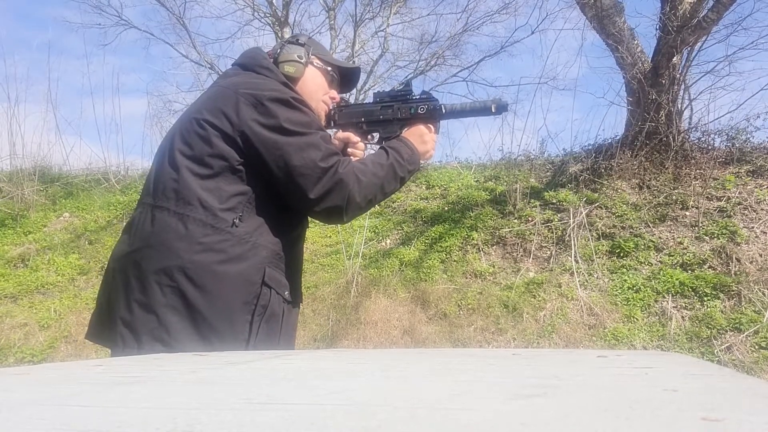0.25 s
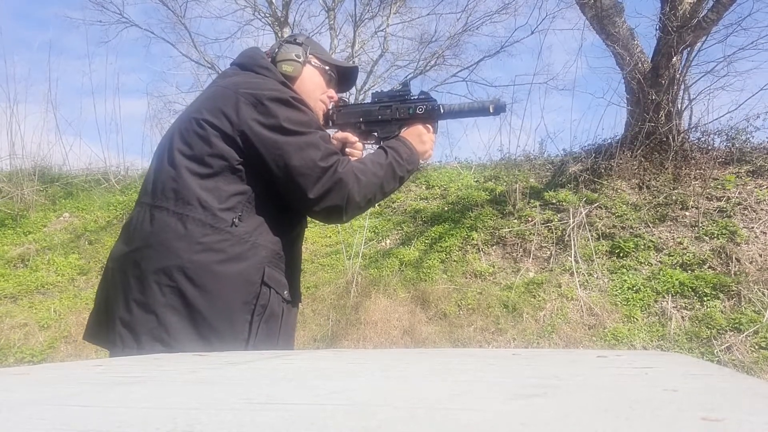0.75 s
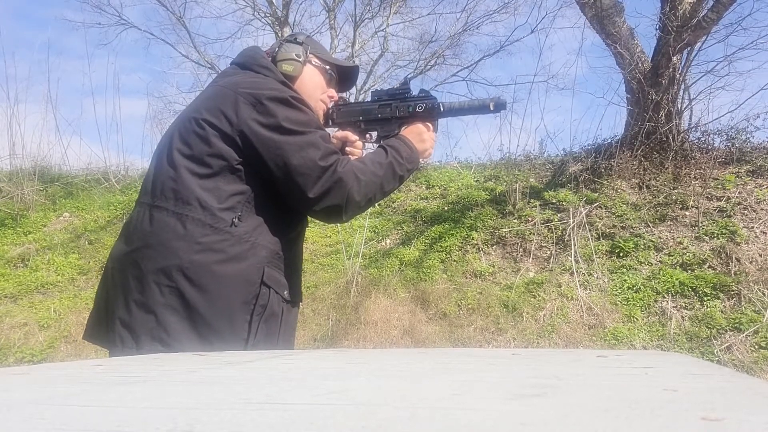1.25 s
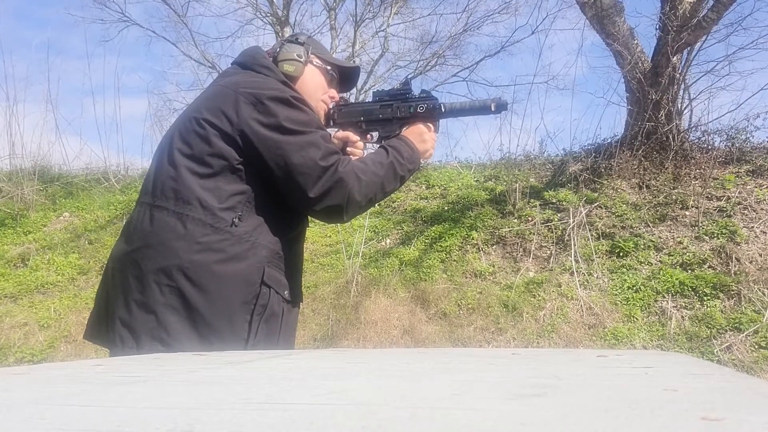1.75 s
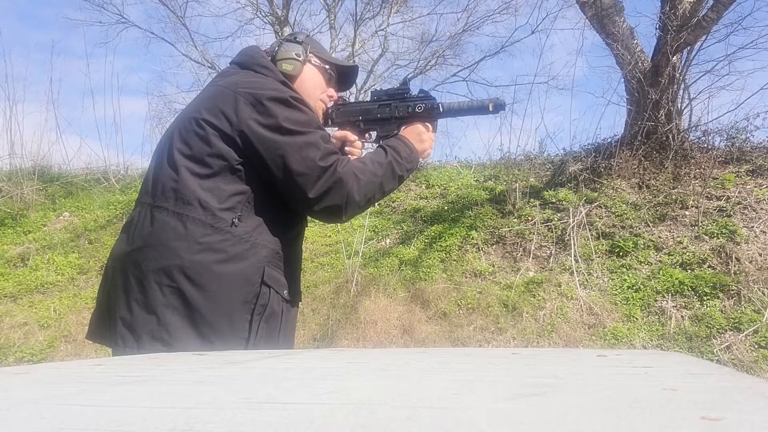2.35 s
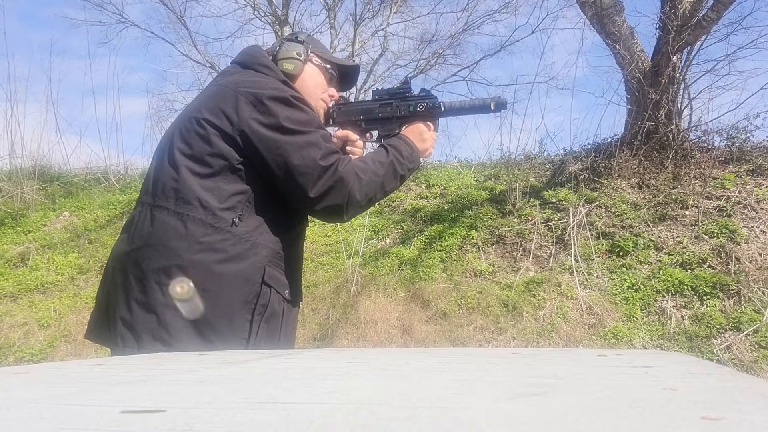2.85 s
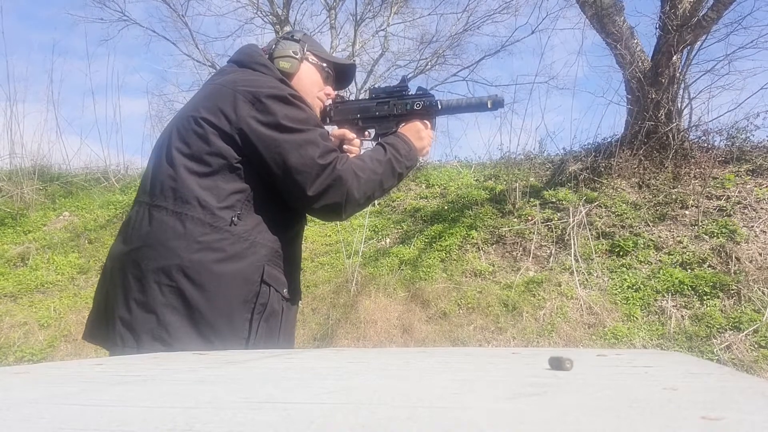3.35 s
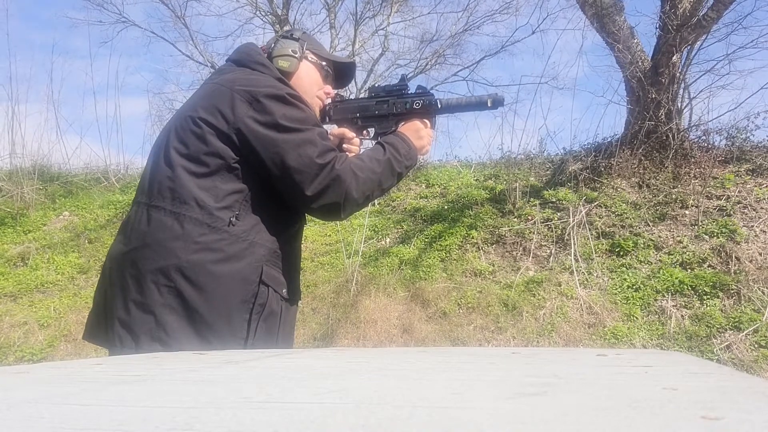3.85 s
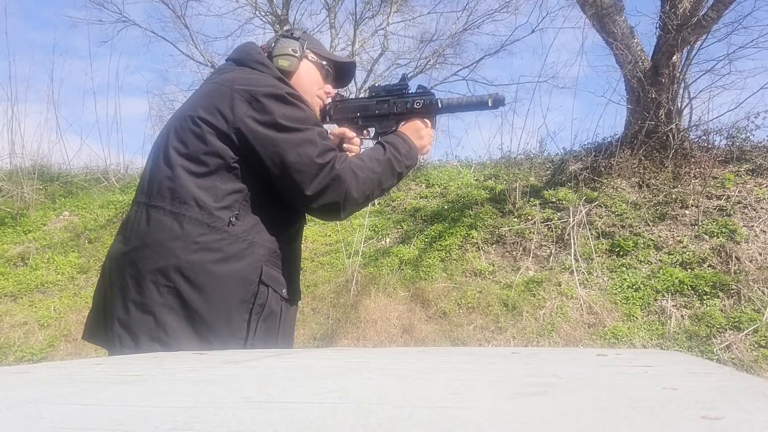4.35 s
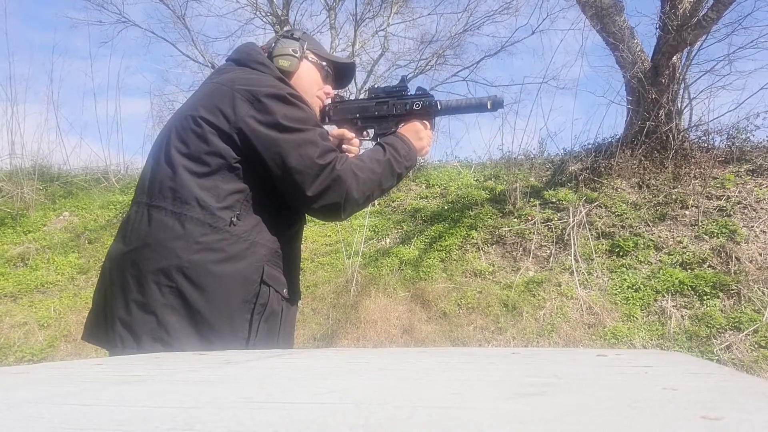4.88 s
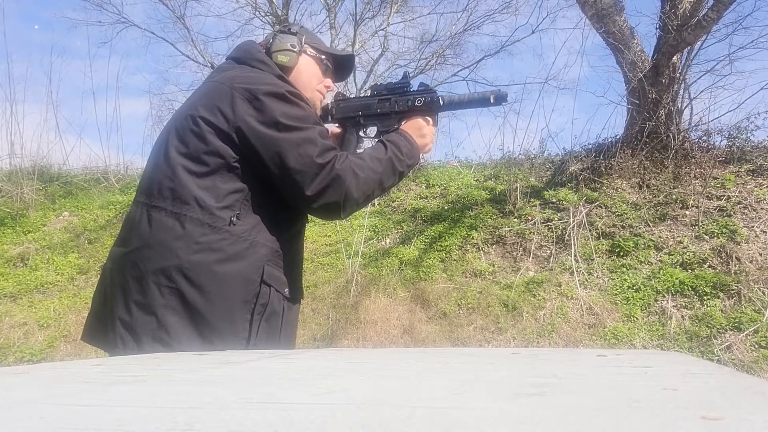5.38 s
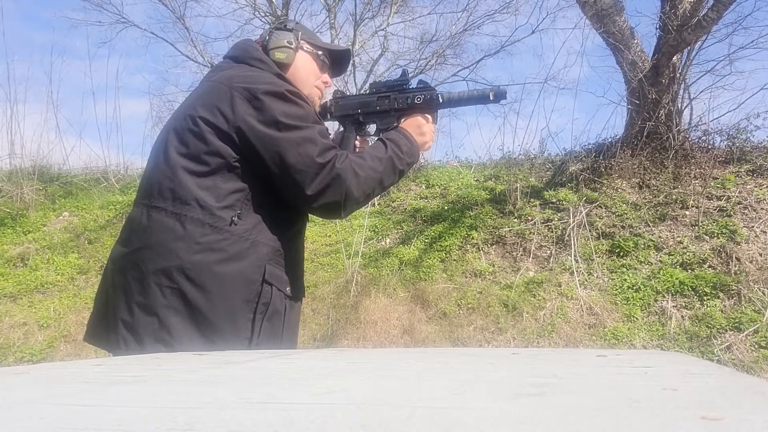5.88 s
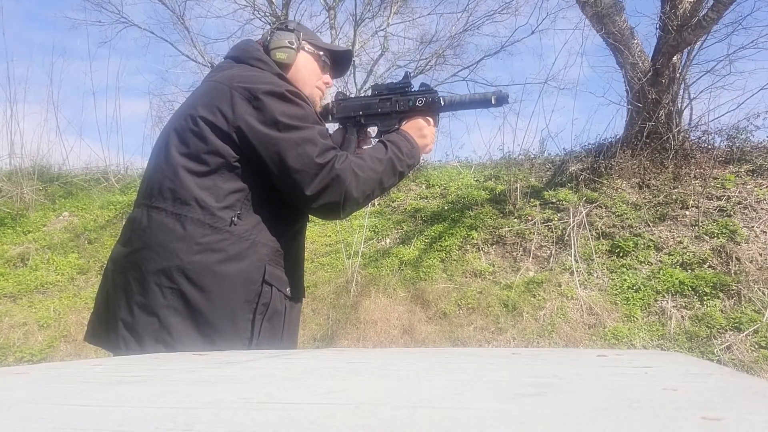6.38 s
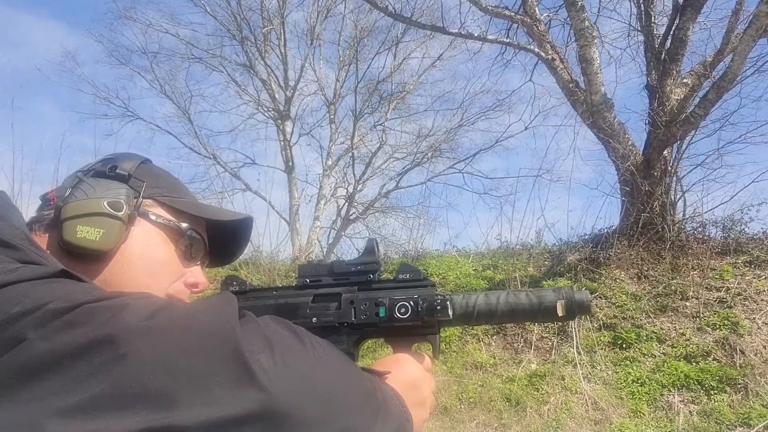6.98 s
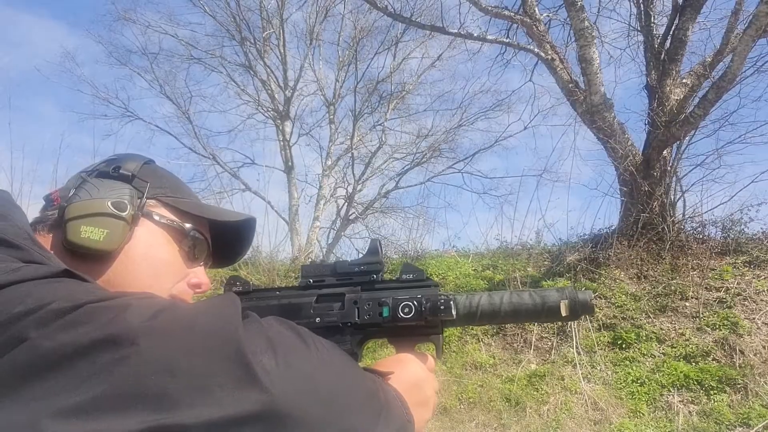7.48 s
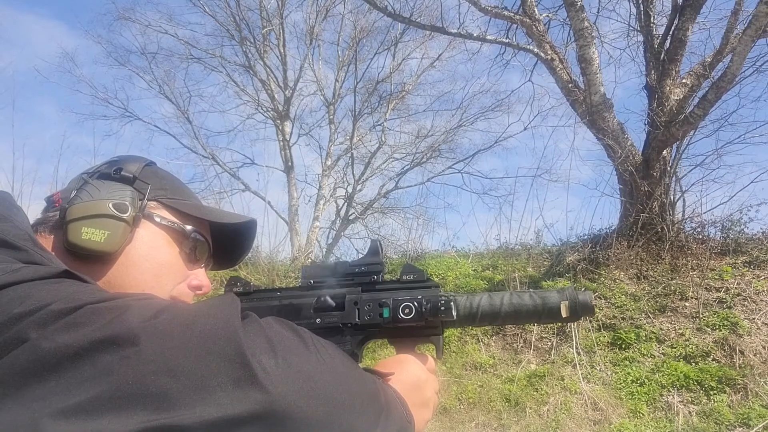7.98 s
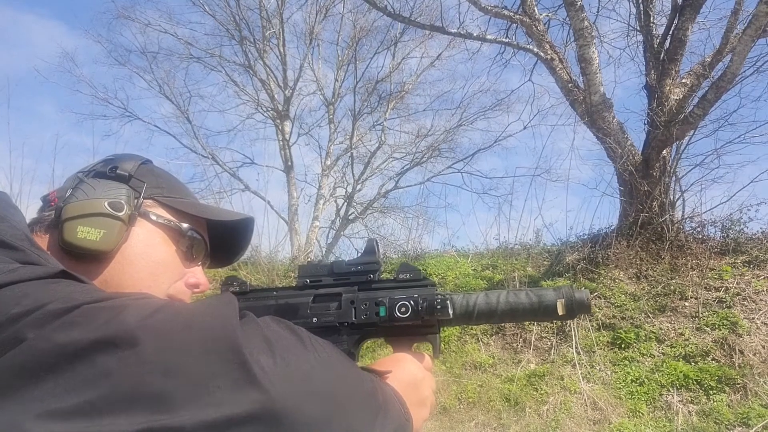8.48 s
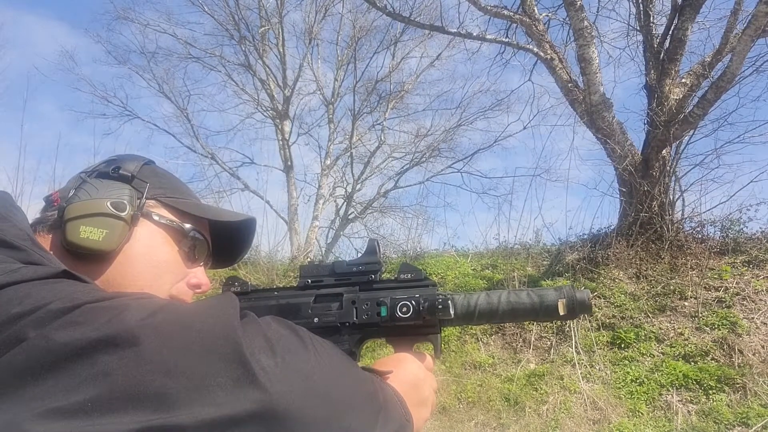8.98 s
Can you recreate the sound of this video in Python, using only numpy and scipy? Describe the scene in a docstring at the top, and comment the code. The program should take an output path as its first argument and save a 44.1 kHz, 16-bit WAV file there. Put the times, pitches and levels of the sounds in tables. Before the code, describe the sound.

Outdoors on an open range, a suppressed carbine fires four steady shots, each a short muffled whump with gas hiss, metallic bolt clack and soft thud in earth. Duller guns report far off with rolling echoes, and a spent case bounces and rolls on a plastic table beside the microphone. Then an abrupt move closer: three more shots, heavier and clackier. Low gusts rumble on the microphone throughout.

```python
"""Outdoor range: first gusts on the microphone ports, then four aimed shots of a suppressed carbine.
Each is a muffled blast, ringing action, gas hiss, bolt at its rear stop, bolt slam and thud in the berm.
Between shots other guns report far off; a spent case bounces, then rolls over the table under the microphone.
The microphone moves at 6.6 s, and the last three shots are heard from close behind the shooter.
Blows are shaped noise and damped modes; echoes are convolutions with clumpy noise."""
import sys
import numpy as np
from scipy import signal
from scipy.fft import rfft, irfft, next_fast_len
from scipy.io import wavfile
from scipy.ndimage import uniform_filter1d

SR = 44100
rng = np.random.default_rng(int(sys.argv[2]) if len(sys.argv) > 2 else 0)


def wrap_up_sound(samples):
    """Save the sound to the file named by the first command line argument, as 16-bit audio."""
    columns = np.atleast_2d(samples).T
    # keep every value between -1 and 1, then stretch to whole-number steps
    tamed = np.clip(columns, -1, 1)
    steps = np.round(tamed * 32767).astype(np.int16)
    wavfile.write(sys.argv[1], SR, steps)


N = 407043
TIME = np.arange(N) / SR
SHORT = TIME[:SR // 3]  # time axis of a single blow

# Levels of blows are base energies; each source function sets its layers relative to them.
# faint rush of the open fields: f/Hz, level/dB
AIR_TONE = [(88, -32), (150, -6.5), (702, -16), (960, -26.5), (1480, -23.5), (2140, -33.5), (6390, -41.5),
            (8070, -61), (11700, -40.5), (16000, -57.5)]
# wind strength at the exposed right port: t/s, level/dB
GUSTS = [(0.0, -37.5), (0.34, -35), (0.42, -31), (0.64, -29.5), (0.8, -49.5), (1.52, -56.5), (1.74, -23),
         (2.2, -52), (2.3, -33), (2.56, -33.5), (3.02, -55.5), (3.3, -41), (3.52, -56.5), (4.44, -37.5),
         (4.62, -51), (5.06, -32), (5.3, -42.5), (6.12, -35.5), (6.4, -49.5), (6.66, -27), (7.24, -51.5),
         (7.38, -35), (8.12, -31), (8.32, -59), (8.5, -38.5), (9.22, -35)]
# single low thumps on the ports, from large eddies and from the case's first landing:
# t/s, energy level/dB, left minus right/dB
LOW_THUMPS = [(2.435, 4.5, -16), (2.645, 1.5, 6.5), (6.601, 9.5, -13)]
# rumble of the eddies: f/Hz, level/dB
WIND_TONE = [(20, -6), (45, -1), (72, 6), (110, -5.5), (170, -16.5), (300, -27), (700, -40.5), (1500, -65),
             (4000, -76.5), (16000, -84)]
# rustle of the small eddies: f/Hz, level/dB
FLUTTER_TONE = [(100, -5.0), (350, 3.5), (700, -3.5), (1500, -19.5), (5000, -41)]

# other guns down the range: t/s, energy level/dB, muzzle hiss relative to it/dB
FAR_SHOTS = [(1.253, -2.5, -18), (2.871, -1.5, -9), (4.422, -5.5, -1.5), (6.172, 2.5, -14),
             (6.252, -3.5, 7.5)]
# dull far report: f/Hz, level/dB
FAR_TONE = [(60, -11), (220, -3.5), (420, 1), (600, -9), (1300, -12.5), (1900, -13), (2600, -26.5),
            (3200, -18.5), (6000, -42.5), (9000, -57), (11500, -46), (16000, -58.5)]
# hiss of the far muzzles: f/Hz, level/dB
FAR_HISS_TONE = [(150, -17.5), (380, -6.5), (550, -2), (730, 5.5), (1200, 1.5), (2500, -15.5),
                 (6000, -29.5), (9000, -49), (11500, -33), (16000, -40)]
# long roll of the far reports: f/Hz, level/dB
FAR_ECHO_TONE = [(80, -3), (400, 1.5), (900, -2.5), (1600, 6.5), (3200, 2), (5500, 2), (9000, -6),
                 (16000, -8.5)]
# scatter off ground and berm: f/Hz, level/dB
SCATTER_TONE = [(60, -9.5), (300, -2.5), (1000, -0.5), (2000, -9), (5000, 2.5), (9000, 1), (12000, 3.5),
                (16000, -1)]
# echo from the woods: f/Hz, level/dB
WOODS_TONE = [(60, -11.5), (400, 4), (1000, -5), (1800, -11), (3500, 1.5), (6000, -8), (10000, -30),
              (16000, -30)]
# echo from the distant bank: f/Hz, level/dB
BANK_TONE = [(200, -10.5), (900, -4), (1400, 1.5), (3000, -8.5), (6000, -18), (12000, -30)]
# echo from the trees on the berm, mostly middle: f/Hz, level/dB
TREE_TONE = [(900, -9), (1750, 0), (2600, -2.5), (6000, -16)]

# spent case landing on the table: t/s, contact energy/dB, table boom/dB, body/dB, treble/dB
BOUNCES = [(2.642, -1, -3.5, 22, -17), (2.759, 3.5, 2, 10, 5), (2.946, 3.5, 2.5, -1.5, -11.5),
           (3.099, 2.5, -1, -4, 0)]
# contact of case and table: f/Hz, level/dB
CASE_TONE = [(100, -16), (400, 2.5), (800, 0), (1600, 3), (3200, -3), (6000, -17.5), (9000, -55.5),
             (12000, -28), (16000, -17)]
# ring of the case: f/Hz, level/dB, t60/s
CASE_MODES = [(1478, -9, 0.048), (1830, -0.5, 0.036), (2700, -9.5, 0.035), (3340, -13, 0.017),
              (15100, -22, .08)]
# boom of the plastic table: f/Hz, level/dB, t60/s
TABLE_MODES = [(148.8, 1.5, 0.18), (211, 0, 0.17), (423.7, -9, 0.11), (580, -15, 0.091), (706, -3, .04),
               (923.7, -17, 0.013), (1150, -12, 0.032)]
# table top under the rolling rim: f/Hz, level/dB, t60/s
ROLLING_MODES = [(583, 0.5, 0.063), (800, 2, .02), (1250, 2.0, 0.024), (3200, -6, .008)]
# strength of the roll until the case drops off the edge: t/s, relative level/dB
ROLLING_SPEED = [(3.35, -38.5), (3.45, -3.0), (3.62, -8.0), (3.72, 0.5), (3.81, 1.5), (3.9, -56)]

# bullet in the berm: f/Hz, level/dB
THUD_TONE = [(60, -15.5), (190, 0.5), (350, -4), (900, -24.5), (1700, -22.5), (4000, -40.5), (16000, -44)]
# trigger resets and small rattles of the gun: t/s, energy level/dB, treble/dB
CLICKS = [(0.695, -1.5, -3), (2.081, -14, 1), (3.324, -18, 7), (4.237, -32.5, -0.5), (4.598, -19.5, 21),
          (5.993, -34.5, -16), (6.8047, 11.5, -7), (7.002, -20.5, -5), (7.176, -28, -4), (8.181, -10, -0.5),
          (8.446, -31, -6.5)]
# bolt slamming shut after each shot: t/s, energy level/dB, body/dB
SLAMS = [(0.7106, 14, -0.5), (2.0419, 2.5, -4), (3.2764, 12, 1.5), (4.542, 11.5, 0), (6.849, 17, 1.5),
         (8.1186, 13.5, 10.5), (9.2258, 12, -6)]
# click of small metal parts: f/Hz, level/dB
CLICK_TONE = [(150, -20), (800, -6), (1400, 6.5), (3000, -10.5), (6000, -16), (8800, -26.5), (11500, -15.5),
              (16000, -25.5)]
# bolt at its rear stop: f/Hz, level/dB
REAR_TONE = [(100, -17.5), (450, -13), (700, -18.5), (920, -2), (1300, -4), (1950, -3.5), (2800, -19.5),
             (4400, -22.5), (5600, -20.5), (8800, -32), (11300, -8.5), (16000, -23)]
# bolt closing: f/Hz, level/dB
CLOSE_TONE = [(80, -26.5), (350, -3.5), (600, -15), (800, -16), (1000, -24.5), (1400, 1), (1800, 4),
              (2500, -17), (3200, -9.5), (5000, -27.5), (8800, -37.5), (11500, -21), (16000, -42)]
# broader slam close behind the shooter: f/Hz, level/dB
NEAR_SLAM_TONE = [(500, 1.5), (950, 10), (1600, 0.5), (3200, 4), (8000, 2.5)]
# ring of the action: f/Hz, level/dB, t60/s
ACTION_MODES = [(1000, -15, 0.014), (1410, 1.5, 0.05), (1470, 3, 0.043), (1810, -7.5, 0.073)]
# carbine shots: t/s, blast energy level/dB, body/dB, treble/dB, gas push energy level/dB
SHOTS = [(0.628, 17.5, -1, -4, -1), (1.9555, 16, 9, 5.5, 9.5), (3.1943, 16.5, -4.5, -1.5, 2.5),
         (4.4589, 16, -1.5, -1, 3.5), (6.762, 18, -10, -1, 17.5), (8.0303, 18, 4, -5, 14.5),
         (9.138, 16.5, 0, 4, 15.5)]
# muffled blast: f/Hz, level/dB
BLAST_TONE = [(60, -8.5), (200, -6), (430, 4.5), (700, -8.5), (1000, 2), (1450, 1.5), (2500, -10),
              (5000, -16.5), (6700, -11.5), (8700, -29.5), (11500, -10.5), (16000, -18.5)]
# escaping gas: f/Hz, level/dB
GAS_TONE = [(100, -7.5), (400, -6), (680, -13), (950, 1.5), (1600, 2.5), (3000, -9), (6500, -23),
            (8800, -29.5), (11300, -8), (16000, -14)]
# low push of the trapped gas: f/Hz, level/dB, t60/s
PUSH_MODES = [(92, 1.53, 0.054), (175, -4, 0.075)]

# balance of the microphone ports: f/Hz, left minus right/dB
PORT_BALANCE = [(200, 0.05), (1300, 0.94), (2400, 0), (4400, -2.5), (8200, -8.5), (15000, -4)]
# likeness of noise at the two ports: f/Hz, likeness 0-1
PORT_LIKENESS = [(100, .6), (400, 0.7), (1400, 0.29), (3100, 0.066), (6500, 0.017)]

MOVE_S = 6.6  # the microphone changes its spot
TOP_HZ = 16200  # top of the recorder's band
# right-port level of a lull, where both ports rumble alike; the left follows this share of a change in dB
LULL_DB, LEE_SHARE = -50, .48
# delays of the far guns' slap off the side berm, and of the distant bank's echo
SLAP_S, BANK_S = .0355, .173
# bank echo of the carbine's blast at the first spot, and its gain at the second
BANK_DB, NEAR_BANK_DB = -36.5, 17
# the gas push leads the blast; the bullet reaches the berm after it
PUSH_LEAD_S, BULLET_S = .0052, .1105
# the bolt breaks loose and reaches its rear stop at these shares of its cycle
UNLOCK_SHARE, REAR_SHARE = .18, .582
# base energies of the blows; the first two get NEAR_ACTION_DB more at the second spot
UNLOCK_DB, REAR_DB, THUD_DB = 8.5, 4.5, -0.84
# close behind the shooter: louder gas and action, an earlier push that favours the right port
NEAR_GAS_DB, NEAR_ACTION_DB, NEAR_LEAD_S, NEAR_LEFT_DB = 2.5, 2.5, .005, -7.5


def undb(db):
    """Decibels to amplitude gain."""
    return 10 ** (np.asarray(db) / 20)


def over_hz(points, size):
    """Reads a table of (f/Hz, value) at the bins of a transform, over log frequency."""
    hz, value = np.transpose(points)
    bins_hz = np.fft.rfftfreq(size, 1 / SR)
    return np.interp(np.log(bins_hz + 1), np.log(hz), value)


def colour(x, points):
    """Causal minimum-phase filter with the given (f/Hz, level/dB) spectrum."""
    size = 2 * next_fast_len(x.shape[-1])
    cepstrum = irfft(np.log(undb(over_hz(points, size))))
    # folding the cepstrum onto positive times makes the filter causal
    cepstrum[1:size // 2] *= 2
    cepstrum[size // 2 + 1:] = 0
    response = np.exp(rfft(cepstrum))
    return irfft(rfft(x, size) * response)[..., :x.shape[-1]]


def shelves(x, body_db, treble_db):
    """Raises or lowers the lows and the highs against the middle."""
    return colour(x, [(500, body_db), (900, 0), (2200, 0), (6000, treble_db)])


def energy(x, db=0):
    """Scales a sound to a total energy, averaged over its channels."""
    mean_energy = np.mean(np.sum(x ** 2, axis=-1))
    return x * undb(db) / np.sqrt(mean_energy)


def noise(size):
    """Noise at two ports: more alike in the bass, nearly unrelated in the treble."""
    likeness = np.clip(over_hz(PORT_LIKENESS, size), 0, 1)
    spectra = rfft(rng.standard_normal((2, size)))
    mid, side = spectra * np.sqrt([1 + likeness, 1 - likeness])
    return irfft(np.array([mid + side, mid - side]) / np.sqrt(2), size)


def fade(t, t60):
    """Exponential decay by 60 dB in t60 seconds."""
    return np.exp(-np.log(1000) * t / t60)


def walk(rate):
    """Smooth random wandering with a spread near 1, taking rate steps a second."""
    k = int(SR / rate)
    steps = np.repeat(rng.standard_normal(N // k + 1), k)
    return uniform_filter1d(steps, k)[:N]


def burst(rise_s, t60):
    """Turbulence that swells to a peak and dies away; returns the sound and its lead before the peak."""
    t = SHORT - 6 * rise_s
    swell = np.exp(np.minimum(t, 0) / rise_s)
    decay = fade(np.maximum(t, 0), t60)
    return energy(noise(len(t)) * swell * decay), -t[0]


def knock(chatter_db, t60):
    """A hard contact as one impulse, followed by dense decaying chatter."""
    chatter = noise(len(SHORT)) * fade(SHORT, t60)
    return (SHORT == 0) + energy(chatter, chatter_db)


def ring(modes, spread):
    """Damped modes at unit energy, their pitches a little different at each blow."""
    total = 0
    for hz, db, t60 in modes:
        pitch_hz = hz * (1 + spread * rng.standard_normal())
        total = total + undb(db) * np.sin(2 * np.pi * pitch_hz * SHORT) * fade(SHORT, t60)
    return energy(total)


def add(out, s, x):
    """Mixes a sound in at a time in seconds."""
    i = max(int(s * SR), 0)
    out[:, i:i + x.shape[-1]] += x[..., :max(N - i, 0)]


def delayed(x, s):
    """The same sound s seconds later."""
    out = np.zeros((2, N))
    add(out, s, x)
    return out


def echoes(x, tone, build_s, t60, db, lumpy_db):
    """Convolution with countless small reflections that build up and fade, arriving in clumps."""
    t = TIME[:2 * SR]
    shape = (1 - np.exp(-t / build_s)) * fade(t, t60)
    shape *= undb(lumpy_db * walk(45)[:len(t)])
    # single trunks and stones stand out as brief flecks
    shape *= undb(3 * walk(170)[:len(t)])
    reflections = energy(colour(noise(len(t)), tone) * shape, db)
    return signal.fftconvolve(x, reflections, axes=1)[:, :N]


def open_air():
    """A faint rush of coloured noise from the fields, wavering slightly, louder at the second spot."""
    air = colour(noise(N), AIR_TONE)
    level_db = -64.0 + 2.9 * (TIME > MOVE_S) + 1.3 * walk(18)
    return air / air.std() * undb(level_db)


def wind_and_low_thumps():
    """Partly shared eddies rumble on the ports, small ones rustle; single low thumps are damped modes."""
    right_db = np.interp(TIME, *np.transpose(GUSTS))
    left_db = LULL_DB + LEE_SHARE * (right_db - LULL_DB)
    gust_db = np.array([left_db, right_db])
    eddies = colour(rng.standard_normal((2, N)) + .45 * rng.standard_normal(N), WIND_TONE)
    flutter = colour(noise(N), FLUTTER_TONE)
    # the rustle follows the gusts less steeply than the rumble
    rustle_db = .5 * gust_db.mean(0) - 48.3 + 2.3 * walk(70) + 6.3 * (TIME > MOVE_S)
    rustle = flutter / flutter.std() * undb(rustle_db)
    rumble = eddies / eddies.std() * undb(gust_db + 3.0 * walk(18))
    out = rumble + rustle
    for s, db, pan_db in LOW_THUMPS:
        thump = (1 - fade(SHORT, t60=.06)) * ring([(67.8, 0, .09)], spread=.04)
        add(out, s, energy(thump * undb([[pan_db / 2], [-pan_db / 2]]), db))
    return out


def far_guns():
    """Dull reports at the first spot, with a slap off a side berm and a long roll through the trees."""
    reports, hisses = np.zeros((2, 2, N))
    for s, db, hiss_db in FAR_SHOTS:
        report, lead = burst(rise_s=.0007, t60=0.03)
        add(reports, s + 0.00059 - lead, energy(colour(report, FAR_TONE), db))
        slap = knock(chatter_db=8, t60=.05)
        add(reports, s + SLAP_S, energy(colour(slap, FAR_TONE), db - 6.0))
        hiss, lead = burst(rise_s=0.0025, t60=0.036)
        hiss = energy(colour(hiss, FAR_HISS_TONE), db + hiss_db)
        add(hisses, s + .001 - lead, hiss)
        add(hisses, s + SLAP_S + 0.0033 - lead, undb(-4.0) * hiss)
    direct = reports + hisses
    roll = echoes(reports, FAR_ECHO_TONE, build_s=.01, t60=1.3, db=-11, lumpy_db=3.0)
    roll += echoes(direct, SCATTER_TONE, build_s=.005, t60=.13, db=-6, lumpy_db=2)
    # the distant bank answers a moment later
    bank = echoes(reports, FAR_ECHO_TONE, build_s=.004, t60=.6, db=-17, lumpy_db=3.5)
    roll += delayed(bank, BANK_S)
    # an earlier report is still dying away at the start
    early = colour(colour(noise(N), FAR_TONE), FAR_ECHO_TONE) * fade(TIME, 0.8)
    return (direct + roll) * (TIME < MOVE_S) + energy(early, -15)


def spent_case():
    """The brass case rings and booms the plastic table at each bounce, then rolls off it."""
    out = np.zeros((2, N))
    for s, db, boom_db, body_db, treble_db in BOUNCES:
        contact, lead = burst(rise_s=0.001, t60=0.018)
        contact = shelves(colour(contact, CASE_TONE), body_db, treble_db)
        add(out, s + .001 - lead, energy(contact, db))
        # a brighter contact rings the case harder
        add(out, s, undb(db - 10.5 + 0.744 * treble_db) * ring(CASE_MODES, spread=0.0046))
        add(out, s, undb(boom_db) * ring(TABLE_MODES, spread=0.034))
    # the rim rumbles over the grain of the table top: about 1200 random contacts a second
    contacts = rng.random(N) < 1200 / SR
    grains = contacts * rng.exponential(size=N) * rng.choice([-1, 1], N)
    speed_db = np.interp(TIME, *np.transpose(ROLLING_SPEED))
    wobble = undb(4 * walk(60))
    grains = grains * wobble * undb(speed_db) * (speed_db > -45)
    table_top = ring(ROLLING_MODES, spread=0.012) + energy(colour(SHORT == 0, CASE_TONE), -11)
    rolling = signal.fftconvolve(grains, table_top)[:N]
    return out + energy(rolling, -16.5)


def berm():
    """Soft earth swallows each bullet with a dull thud: an impulse and chatter with little treble."""
    out = np.zeros((2, N))
    for s, *_ in SHOTS:
        thud = colour(knock(chatter_db=6.0, t60=.075), THUD_TONE)
        add(out, s + BULLET_S, energy(thud, THUD_DB))
    return out


def action():
    """The bolt breaks loose, scrapes back to its stop, and slams shut with one small rebound."""
    out = np.zeros((2, N))
    for (s, *_), (shut_s, slam_db, slam_body_db) in zip(SHOTS, SLAMS):
        near = s > MOVE_S
        cycle_s = shut_s - s
        unlock_s = s + UNLOCK_SHARE * cycle_s
        unlock_db = UNLOCK_DB + NEAR_ACTION_DB * near
        add(out, unlock_s, undb(unlock_db - 3.0) * ring(ACTION_MODES, spread=.015))
        unlock = colour(knock(chatter_db=3.5, t60=0.068), GAS_TONE)
        add(out, unlock_s, energy(unlock, unlock_db - 10))

        rear_s = s + REAR_SHARE * cycle_s
        rear_db = REAR_DB + NEAR_ACTION_DB * near
        scrape, stop = burst(rise_s=.008, t60=0.048), burst(rise_s=.0004, t60=0.017)
        for (blow, lead), db in [(scrape, -2), (stop, 4)]:
            blow = shelves(colour(blow, REAR_TONE), body_db=-2.5, treble_db=-4.5 + 2.4 * near)
            add(out, rear_s - lead, energy(blow, rear_db + db))

        feed, lead = burst(rise_s=.003, t60=.04)
        add(out, shut_s - lead, energy(colour(feed, CLOSE_TONE), slam_db - 12.5))
        slam = knock(chatter_db=-3, t60=.006)
        if near:
            slam = colour(slam, NEAR_SLAM_TONE)
        # a light closing is a thin click, a hard one a full clack
        slam_treble_db = 8.5 - .85 * slam_db + 2 * near
        slam = shelves(colour(slam, CLOSE_TONE), slam_body_db, slam_treble_db)
        add(out, shut_s, energy(slam, slam_db))
        rebound = colour(knock(chatter_db=8.0, t60=0.031), CLICK_TONE)
        add(out, shut_s + 0.0081, energy(rebound, slam_db - 17))
    for s, db, treble_db in CLICKS:
        rattle, lead = burst(rise_s=0.00051, t60=.025)
        add(out, s - lead, energy(shelves(colour(rattle, CLICK_TONE), 0, treble_db), db))
    return out


def muzzle():
    """The baffles stretch the blast into a short rush; trapped gas pushes and hisses out."""
    out = np.zeros((2, N))
    for s, db, body_db, treble_db, push_db in SHOTS:
        near = s > MOVE_S
        rush, lead = burst(rise_s=0.0055, t60=0.028)
        rush = shelves(colour(rush, BLAST_TONE), body_db + 0.5, treble_db - 4.5)
        add(out, s - lead, energy(rush, db - 3))
        crack = colour(knock(chatter_db=16.5, t60=0.038), BLAST_TONE)
        add(out, s, energy(shelves(crack, body_db - 6, treble_db), db - 5.0))
        gas, lead = burst(rise_s=.012, t60=0.18)
        add(out, s + .022 - lead, energy(colour(gas, GAS_TONE), db - 18.0 + NEAR_GAS_DB * near))
        push = energy(ring(PUSH_MODES, spread=.04), push_db)
        push = push * undb([[NEAR_LEFT_DB * near], [0]])
        add(out, s - PUSH_LEAD_S - NEAR_LEAD_S * near, push)
    return out


def scene():
    """The gun with its scatter off ground and berm and its echoes from bank and woods, among the rest."""
    blasts = muzzle()
    near = TIME > MOVE_S
    gun = blasts + action() + berm()
    scatter = echoes(gun, SCATTER_TONE, build_s=.012, t60=.25, db=-15.5, lumpy_db=2.5) * undb(3 * near)
    woods = echoes(gun, WOODS_TONE, build_s=.03, t60=0.69, db=-34.5, lumpy_db=2.0)
    bank = delayed(colour(blasts, BANK_TONE), BANK_S) * undb(BANK_DB + NEAR_BANK_DB * near)
    # the trees on the berm return the middle of the sound as one soft swell
    trees = delayed(echoes(gun, TREE_TONE, build_s=.04, t60=0.33, db=-42.0, lumpy_db=4.5), 0.095)
    sound = gun + scatter + woods + bank + trees + spent_case() + far_guns()
    left = colour(sound[0], [(hz, db / 2) for hz, db in PORT_BALANCE])
    right = colour(sound[1], [(hz, -db / 2) for hz, db in PORT_BALANCE])
    return np.array([left, right]) + wind_and_low_thumps() + open_air()


def record(dry):
    """The recorder clips peaks at full scale, then a steep low-pass cuts the top."""
    low_pass = signal.ellip(8, .2, 70, TOP_HZ, fs=SR, output="sos")
    return signal.sosfilt(low_pass, np.clip(dry, -1, 1))


dry = scene()
out = record(dry)
wrap_up_sound(out)
```